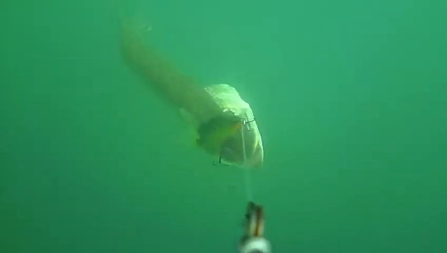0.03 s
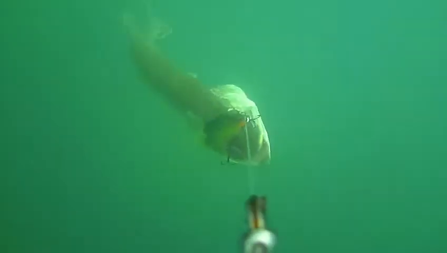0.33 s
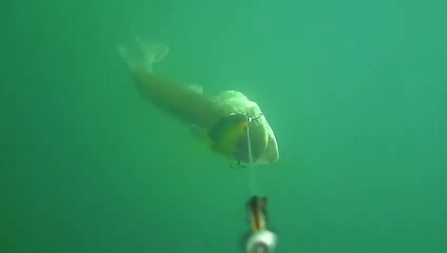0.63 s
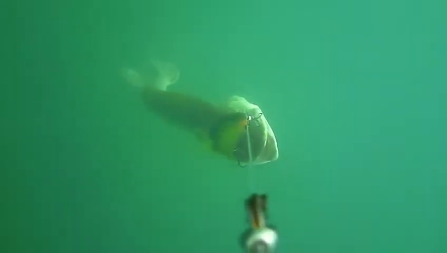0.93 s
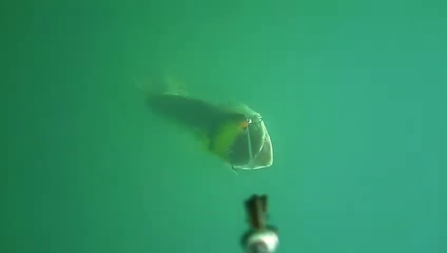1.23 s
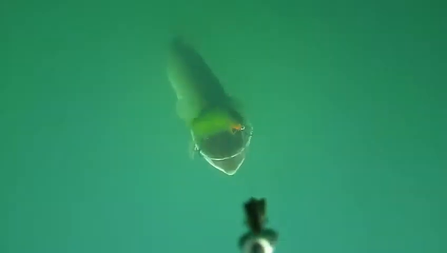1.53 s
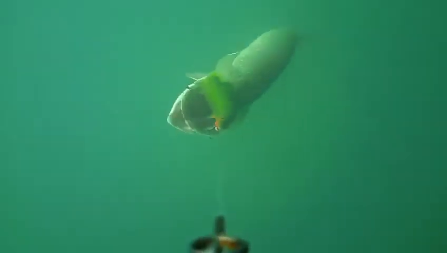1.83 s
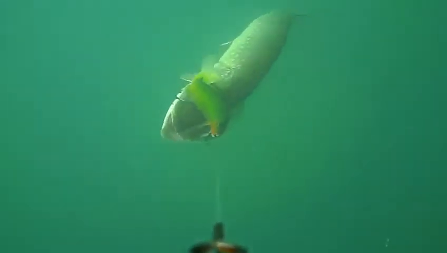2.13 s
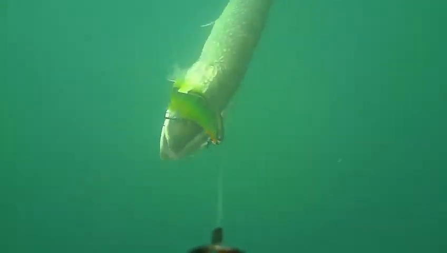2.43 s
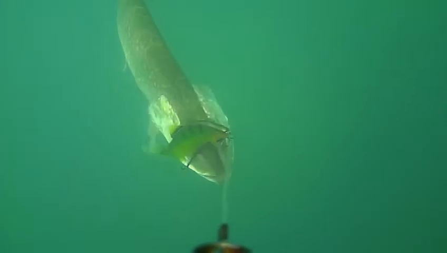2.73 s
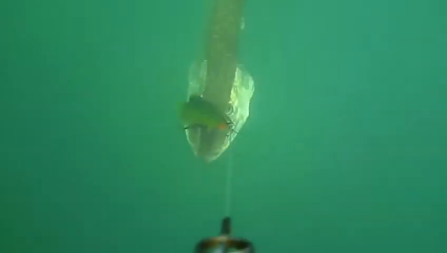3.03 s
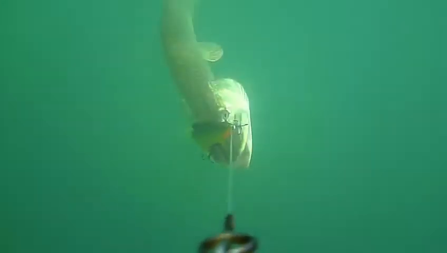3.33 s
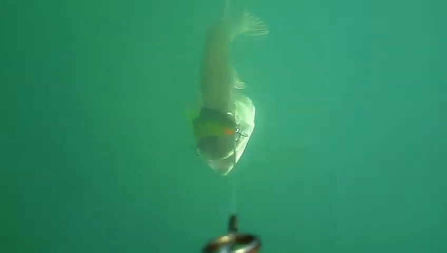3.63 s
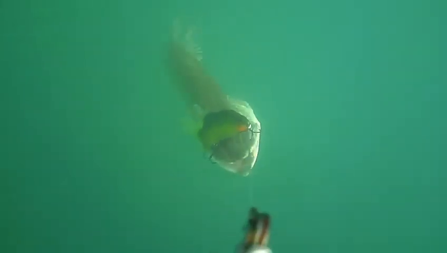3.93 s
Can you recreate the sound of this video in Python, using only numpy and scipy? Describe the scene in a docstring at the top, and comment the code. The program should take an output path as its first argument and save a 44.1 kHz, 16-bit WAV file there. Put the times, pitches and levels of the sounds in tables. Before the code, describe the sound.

A taut fishing line rubs, squeals and finally pops sharply as a hooked fish struggles, with tiny metal clicks near the end. Quiet humming, rumbling water and hiss come first, all heard from inside a towed underwater housing.

```python
"""A hooked fish under water, heard from inside the housing of a camera towed on the same line.
From the start the taut line hums with the towing speed, water rumbles past and the line rubs faintly,
all over the microphone's steady hiss. From about 2.2 s the fish swings round: the line scrapes, squeals
and catches right against the housing. From 3.3 s the fish shakes its head, so the line pops hard
and the hooks tick."""
import sys
import numpy as np
from scipy import signal
from scipy.fft import rfft, irfft
from scipy.io import wavfile

SR = 44100
rng = np.random.default_rng(int(sys.argv[2]) if len(sys.argv) > 2 else 0)


def master_out(mix):
    """Clip the mix to full scale and print it as 16-bit PCM to the path in sys.argv[1]."""
    frames = np.transpose(np.atleast_2d(mix))
    ceiling = np.clip(frames, -1, 1)
    pcm = np.round(ceiling * 32767).astype(np.int16)
    wavfile.write(sys.argv[1], SR, pcm)


N = 176400
TIME = np.arange(N) / SR

# Hum of the taut line. Each row: time in seconds, pitch in Hz, level in dB.
LINE_HUM = [(0, 55, -57), (.2, 48.6, -65.5), (.7, 50.7, -53.5), (1.25, 50.7, -67.5), (1.82, 57.65, -57),
            (1.96, 65, -53), (2.06, 68.15, -60.5), (2.24, 95.3, -48), (2.32, 96.8, -59.5),
            (2.41, 100.3, -42), (2.55, 92.4, -55), (2.66, 95.4, -48), (2.8, 68, -64.5), (3.68, 59.2, -67),
            (4, 66, -49.5)]
# The octave above the hum. Each row: time in seconds, level in dB.
HUM_OCTAVE = [(0, -67.5), (1.3, -71), (2.05, -64.5), (2.27, -55.5), (2.58, -65.5), (2.8, -55.5), (3, -76.5),
              (4, -62)]
# Water flowing past the housing. Each row: time in seconds, level in dB.
FLOW_LEVEL = [(0, -59), (1.3, -59.5), (2.65, -51), (3.35, -47), (3.7, -58)]
# Colour of that flow. Each row: frequency in Hz, gain in dB.
FLOW_SPECTRUM = [(15, 5.5), (130, -20.5), (600, -49), (2000, -63)]
# Colour of the microphone's hiss. Each row: frequency in Hz, gain in dB.
HISS_SPECTRUM = [(20, -2), (60, 11.5), (150, 11.5), (600, 5), (2500, -1.5), (11500, -6)]
# Faint rubs of the line. Each row: middle in seconds, half length in seconds, level in dB,
# band centre in Hz, half width in octaves.
LINE_RUBS = [(0.049, 0.011, -57, 1560, 0.087), (0.168, 0.033, -58.5, 1480, .18),
             (1.423, 0.0072, -54.5, 2070, 0.17), (1.506, 0.01, -58.5, 2180, 0.18),
             (1.62, 0.017, -60.5, 1550, 0.23), (1.78, 0.046, -55, 1480, 0.67),
             (2.218, 0.012, -52, 1068, 0.57)]
# The line scraping right on the housing. Each row: time in seconds, level in dB.
SCRAPE_LEVEL = [(2.18, -81), (2.29, -48), (2.43, -45), (2.48, -53.5), (2.62, -39.5), (2.69, -45),
                (2.73, -49), (2.8, -48.5), (2.98, -46), (3.07, -51), (3.11, -58.5), (3.155, -46.5),
                (3.2, -67.5), (3.26, -45.5), (3.305, -57), (3.36, -44), (3.4, -55), (3.5, -43.5),
                (3.555, -59.5), (3.62, -47.5), (3.725, -62), (3.77, -48), (4, -69.5)]
# Colour of that scraping. Each row: frequency in Hz, gain in dB.
SCRAPE_SPECTRUM = [(120, -43), (400, -32), (520, -7), (640, -17.5), (940, -5.5), (1230, -17.5), (1950, 0),
                   (2280, 0.5), (2900, -10.5), (3300, -21), (4000, -27), (7000, -58)]
# Squeals of the sliding line. Each row: start in seconds, length in seconds, pitch in Hz,
# glide in octaves, level in dB.
LINE_SQUEALS = [(2.289, .075, 947, -0.154, -43.5), (2.378, 0.034, 2445, 0.12, -41),
                (2.484, 0.029, 940, 0.22, -45.5), (2.521, 0.034, 2004, 0.36, -41),
                (2.696, 0.081, 2239, -.1, -36.5), (2.843, 0.0195, 2340, 0.31, -42),
                (2.904, 0.017, 2320, -0.25, -39), (2.989, .08, 2024, -0.2, -39.5),
                (3.137, 0.025, 1905, 0.14, -41)]
# Jerks of the line, from small catches to hard head shakes. Each row: start in seconds,
# hold in seconds, level in dB, pitch in Hz.
LINE_JERKS = [(2.289, .002, -41, 2380), (2.592, 0.0017, -33, 2100), (2.606, 0.0026, -32, 2480),
              (2.623, .003, -32.5, 2250), (2.647, 0.0024, -33, 2310), (2.66, .002, -36.5, 2600),
              (2.702, 0.0038, -36, 2390), (2.813, .004, -30, 2347), (2.934, 0.002, -33.5, 2450),
              (2.965, 0.0024, -37, 2300), (2.977, 0.0021, -31, 2240), (3.346, .013, -18.5, 2353),
              (3.4313, 0.0034, -19, 2300), (3.4435, 0.0034, -15.5, 2220), (3.455, 0.0024, -21, 2117),
              (3.463, 0.0075, -19, 2142), (3.4946, 0.0024, -14, 2756), (3.5718, 0.0011, -28.5, 2443),
              (3.588, 0.0037, -27, 2700), (3.646, 0.0064, -21.5, 2363), (3.7381, 0.0016, -19.5, 2234)]
# The housing's ring under a jerk, heard from inside. Each row: frequency in Hz, gain in dB.
HOUSING_SPECTRUM = [(380, -31), (530, -15.5), (650, -27), (1200, -22), (1600, -6.5), (2150, 5),
                    (2500, -0.5), (2750, 1.5), (3280, -22.5), (3700, -4.5), (4350, -28.5), (4900, -23.5),
                    (5800, -50)]
# Sharp ticks of the hooks. Each row: start in seconds, level in dB.
HOOK_TICKS = [(3.3705, -26.5), (3.496, -35.5), (3.667, -39.5), (3.756, -29), (3.765, -29.5)]
# Colour of a tick. Each row: frequency in Hz, gain in dB.
TICK_SPECTRUM = [(200, -15.5), (1500, 8.5), (3900, 0.5), (5200, -10), (12000, -23)]


def amp(db):
    """Decibels to gain."""
    return 10 ** (np.asarray(db) / 20)


def unit(x):
    """Scales to an rms of one."""
    return x / np.sqrt(np.mean(x ** 2) + 1e-20)


def curve(table, column=1):
    """Joins a table's rows with straight lines over the whole scene."""
    rows = np.array(table)
    return np.interp(TIME, rows[:, 0], rows[:, column])


def add(mix, start_s, sound):
    """Lays a sound into the mix."""
    part = mix[max(round(start_s * SR), 0):][:len(sound)]
    part += sound[:len(part)]


def colour(x, spectrum):
    """Filters x by a spectrum and scales it to an rms of one."""
    hz, db = np.transpose(spectrum)
    freqs = np.fft.rfftfreq(2 * len(x), 1 / SR)
    gain = amp(np.interp(np.log(freqs + 1), np.log(hz), db))
    return unit(irfft(rfft(x, 2 * len(x)) * gain)[:len(x)])


def drift(rate_hz):
    """Smooth random motion up to about the given rate, at an rms of one."""
    freqs = np.fft.rfftfreq(N, 1 / SR)
    return unit(irfft(rfft(rng.standard_normal(N)) * np.exp(-(freqs / rate_hz) ** 2), N))


def burst(x, envelope):
    """Shapes x and gives it the envelope's energy."""
    return unit(x[:len(envelope)] * envelope) * np.sqrt(np.mean(envelope ** 2))


def sine(hz):
    """A sine that follows a moving pitch."""
    return np.sin(2 * np.pi * np.cumsum(hz) / SR)


def line_hum():
    """Eddies shed by the towed line make it hum at one pitch and at its octave."""
    hz = curve(LINE_HUM) * (1 + 0.04 * drift(rate_hz=27))
    flutter_db = 2.5
    fundamental = amp(curve(LINE_HUM, column=2) + flutter_db * drift(rate_hz=15)) * sine(hz)
    octave = amp(curve(HUM_OCTAVE) + flutter_db * drift(rate_hz=15)) * sine(2 * hz)
    return np.sqrt(2) * (fundamental + octave)


def water_flow():
    """Low buffeting right on the housing, growing as the fish pulls the camera about."""
    return colour(rng.standard_normal(N), FLOW_SPECTRUM) * amp(curve(FLOW_LEVEL))


def line_rubs():
    """Light brushes of the line, each a brief swell of grainy noise in one band."""
    out, freqs = np.zeros(N), np.fft.rfftfreq(N, 1 / SR) + 1
    for middle, half_length, db, hz, octaves in LINE_RUBS:
        grains = rng.standard_normal(N) * amp(5.1 * drift(rate_hz=180))
        band = (1 + (np.log2(freqs / hz) / octaves) ** 4) ** -.5
        swell = np.exp(-.5 * ((TIME - middle) / half_length) ** 2)
        out += amp(db) * burst(irfft(rfft(grains) * band, N), swell)
    return out


def line_scrape():
    """Uneven stick and slip of the line sends clumps of grains straight into the housing."""
    slips_per_s, slip_db, grain_db = 66, 3, 3
    slips = sine(slips_per_s * (1 + 0.3017 * drift(rate_hz=40.1)))
    grains = rng.standard_normal(N) * amp(slip_db * slips + grain_db * drift(rate_hz=290))
    touching = TIME > SCRAPE_LEVEL[0][0]
    return colour(grains, SCRAPE_SPECTRUM) * amp(curve(SCRAPE_LEVEL)) * touching


def line_squeals():
    """Each slide of the line is a wavering, bending tone that stirs the housing's low resonance."""
    arch_octaves, hollow_hz, hollow_db = 0.079, 524, -16
    out = np.zeros(N)
    wander = 1 + 0.026 * drift(rate_hz=230)
    flutter = amp(4 * drift(rate_hz=125))
    hollow = sine(hollow_hz * (1 + 0.0598 * drift(rate_hz=98.7))) * flutter
    for start, length, hz, glide, db in LINE_SQUEALS:
        progress = np.arange(0, 1, 1 / (length * SR))
        span = round(start * SR) + np.arange(len(progress))
        swell = np.sin(np.pi * progress)
        bend = glide * (progress - .5) - arch_octaves * (2 * progress - 1) ** 2
        tone = sine(hz * 2 ** bend * wander[span]) * flutter[span]
        gurgle = amp(hollow_db) * burst(hollow[span], swell)
        add(out, start, amp(db) * (burst(tone, swell) + gurgle))
    return out


def line_jerks():
    """The line snaps through its eye: a short squeak that sags in pitch and rattles the housing."""
    rise_s, decay_s, tail_s, tail_gain = 0.0013, 0.0019, 0.0082, amp(-6.5)
    sag_per_s, squeak_share = 13, .6
    out, t = np.zeros(N), np.arange(0, .08, 1 / SR)
    wander = 1 + .04 * drift(rate_hz=420)
    flutter = amp(4 * drift(rate_hz=255))
    for start, hold, db, hz in LINE_JERKS:
        span = round(start * SR) + np.arange(len(t))
        after_hold = np.maximum(t - hold, 0)
        rise = 1 - np.exp(-(t / rise_s) ** 2)
        fall = (1 - tail_gain) * np.exp(-after_hold / decay_s) + tail_gain * np.exp(-after_hold / tail_s)
        envelope = rise * fall
        pitch = hz * np.exp(-sag_per_s * after_hold) * wander[span]
        squeak = unit(sine(pitch) * flutter[span] * envelope)
        rattle = colour(np.sign(rng.standard_normal(len(t))) * envelope, HOUSING_SPECTRUM)
        rattle = unit(rattle - squeak * np.mean(rattle * squeak))  # uncorrelated, so energies add
        pop = np.sqrt(squeak_share) * squeak + np.sqrt(1 - squeak_share) * rattle
        add(out, start, amp(db) * np.sqrt(np.mean(envelope ** 2)) * pop)
    return out


def hook_ticks(decay_s=0.0021):
    """The metal hooks click: small, bright and dry."""
    out, t = np.zeros(N), np.arange(0, .02, 1 / SR)
    for start, db in HOOK_TICKS:
        bright_noise = colour(rng.standard_normal(len(t)), TICK_SPECTRUM)
        add(out, start, amp(db) * burst(bright_noise, np.exp(-t / decay_s)))
    return out


def scene():
    """Under water, everything reaches one microphone through the camera's housing."""
    towing = line_hum() + water_flow() + line_rubs()
    thrashing = line_scrape() + line_squeals() + line_jerks() + hook_ticks()
    return (towing + thrashing)[None]


def record(dry):
    """The microphone adds its own hiss, and the top of the treble is cut off."""
    hiss_db, cutoff_hz = -59, 11800
    hiss = amp(hiss_db) * colour(rng.standard_normal(N), HISS_SPECTRUM)
    lowpass = signal.firwin(401, cutoff_hz, window=("kaiser", 8), fs=SR)
    return signal.oaconvolve(dry + hiss, lowpass[None], "same")


dry = scene()
out = record(dry)
master_out(out)
```